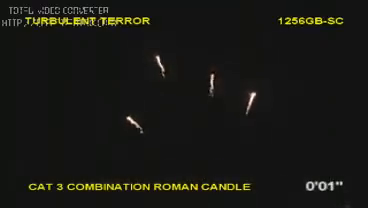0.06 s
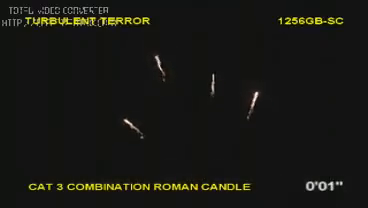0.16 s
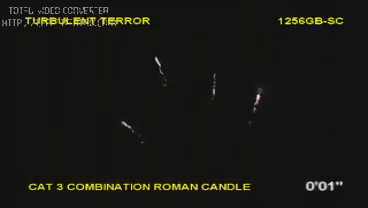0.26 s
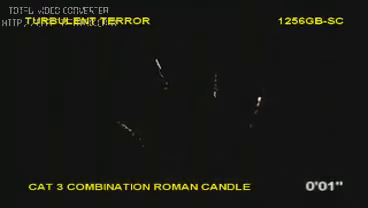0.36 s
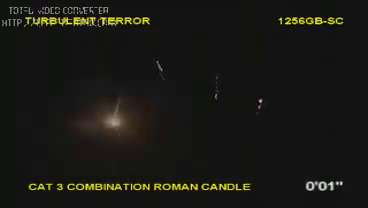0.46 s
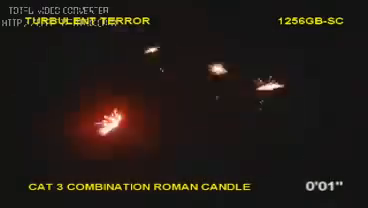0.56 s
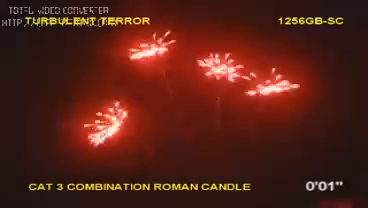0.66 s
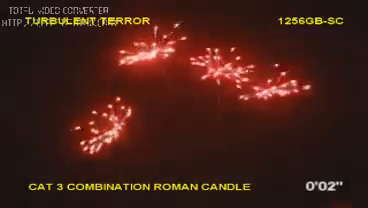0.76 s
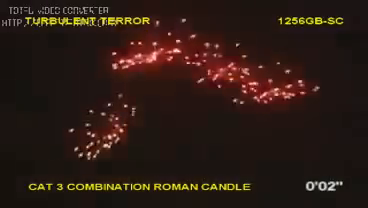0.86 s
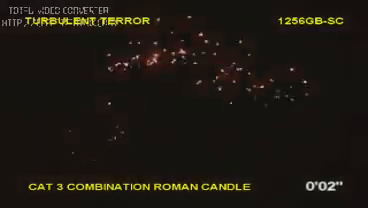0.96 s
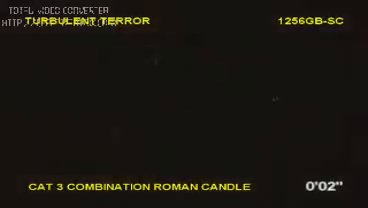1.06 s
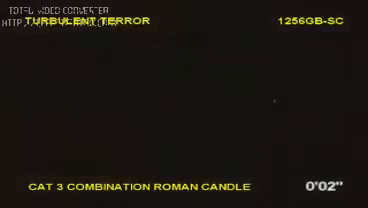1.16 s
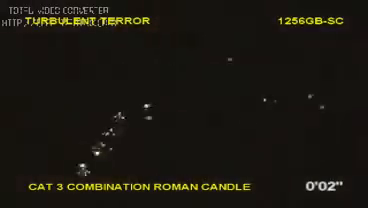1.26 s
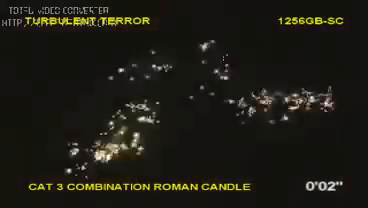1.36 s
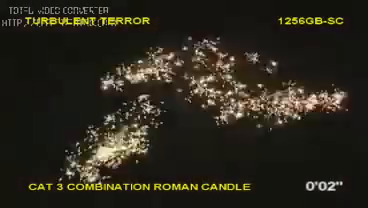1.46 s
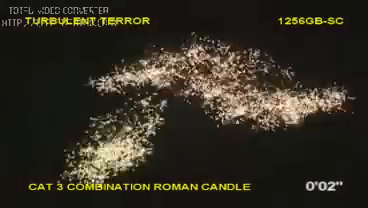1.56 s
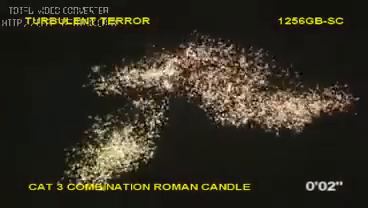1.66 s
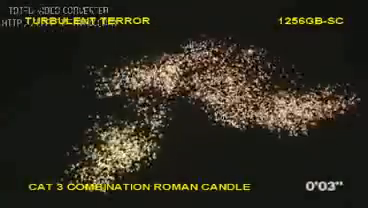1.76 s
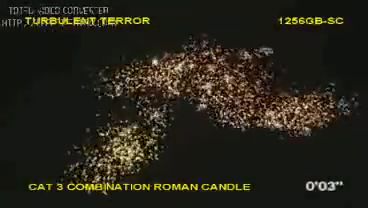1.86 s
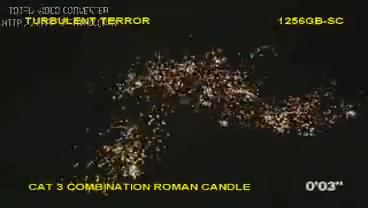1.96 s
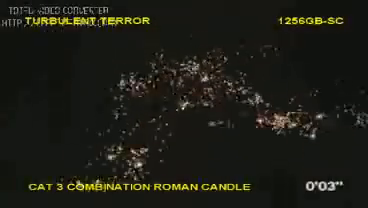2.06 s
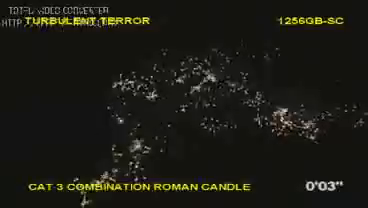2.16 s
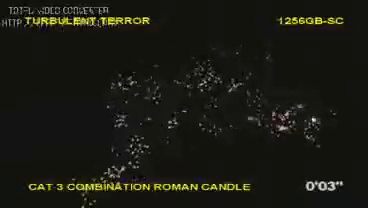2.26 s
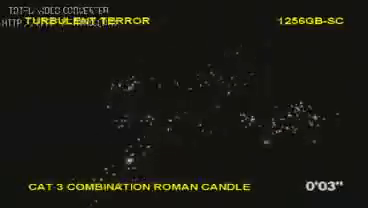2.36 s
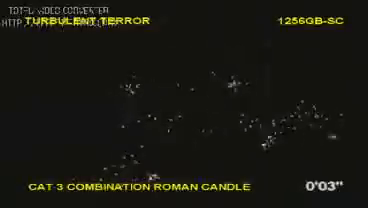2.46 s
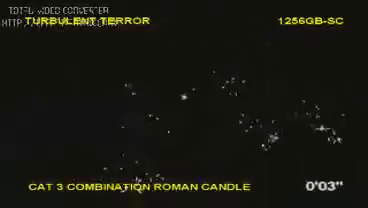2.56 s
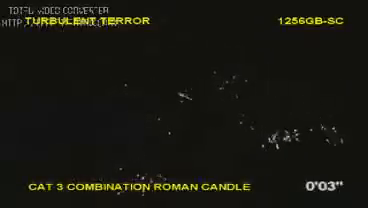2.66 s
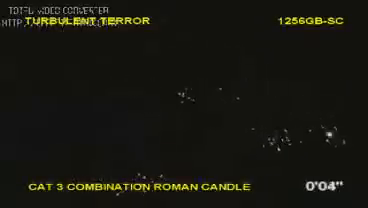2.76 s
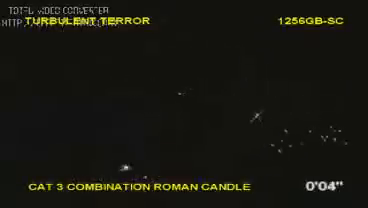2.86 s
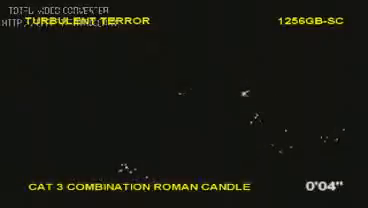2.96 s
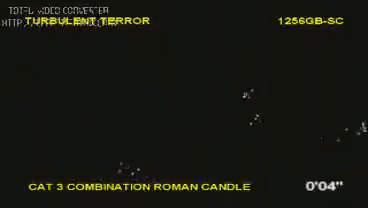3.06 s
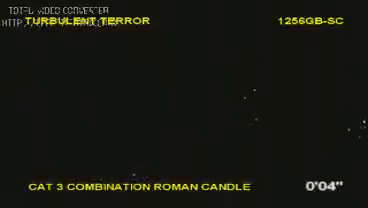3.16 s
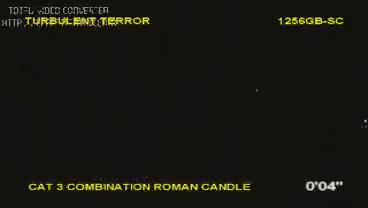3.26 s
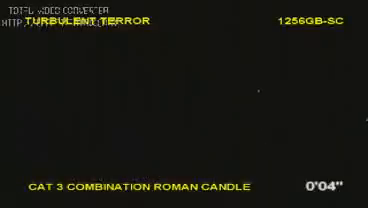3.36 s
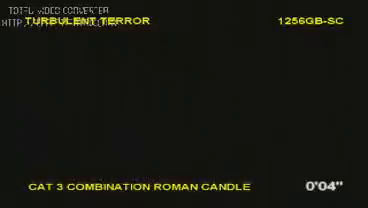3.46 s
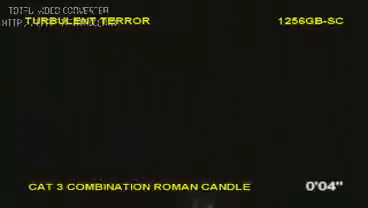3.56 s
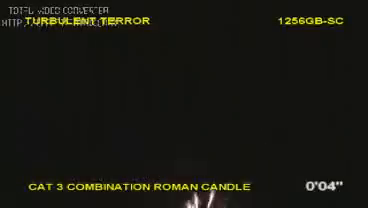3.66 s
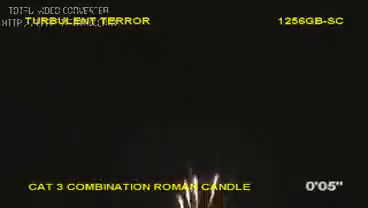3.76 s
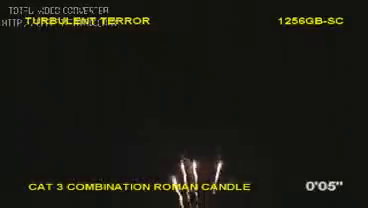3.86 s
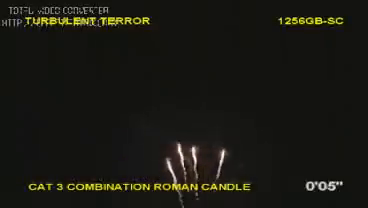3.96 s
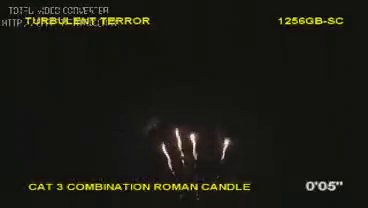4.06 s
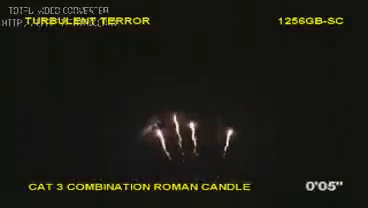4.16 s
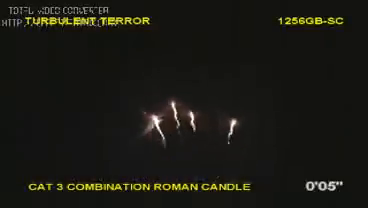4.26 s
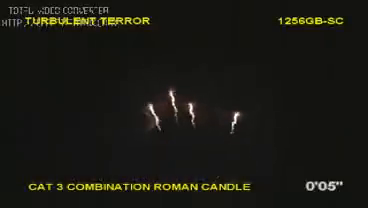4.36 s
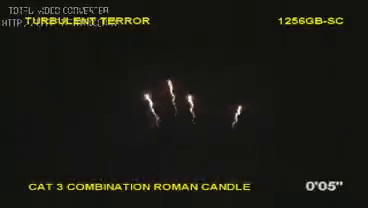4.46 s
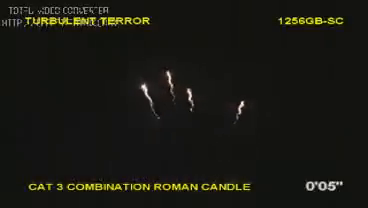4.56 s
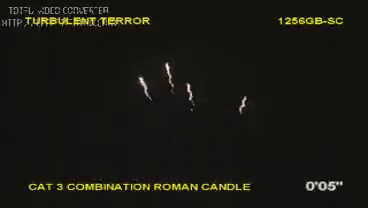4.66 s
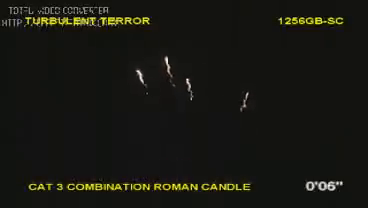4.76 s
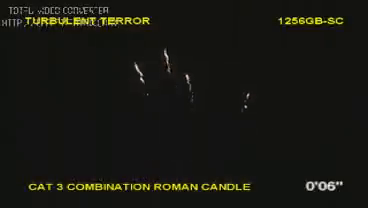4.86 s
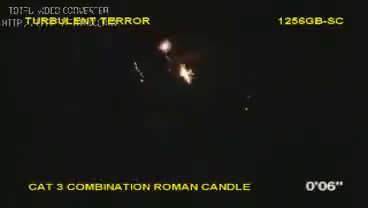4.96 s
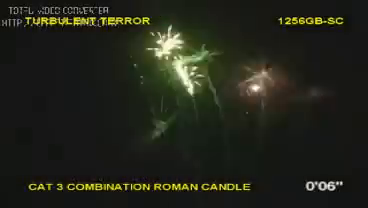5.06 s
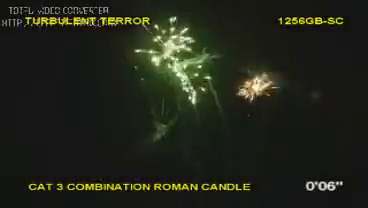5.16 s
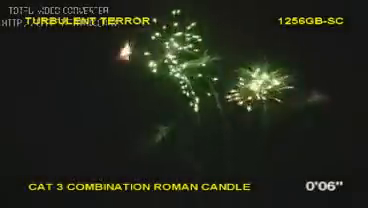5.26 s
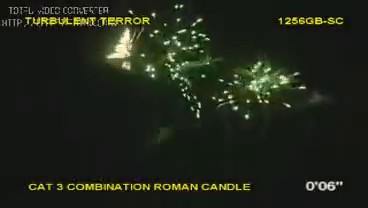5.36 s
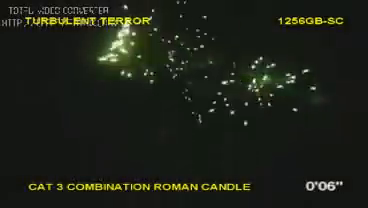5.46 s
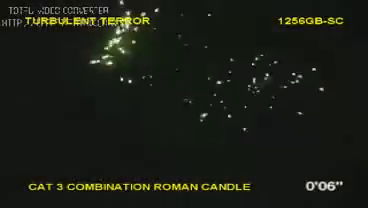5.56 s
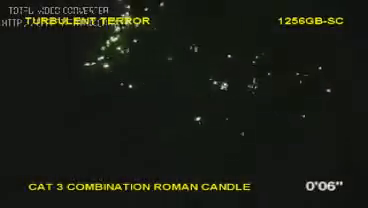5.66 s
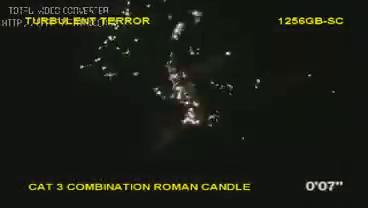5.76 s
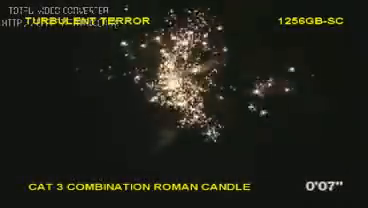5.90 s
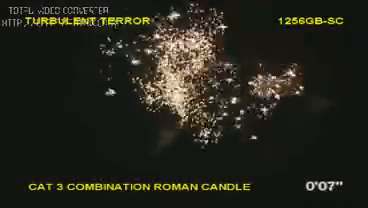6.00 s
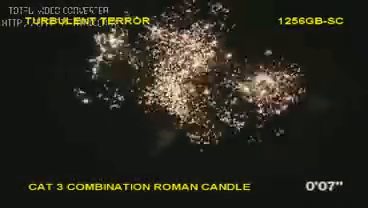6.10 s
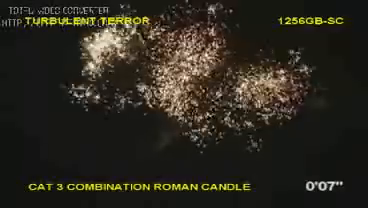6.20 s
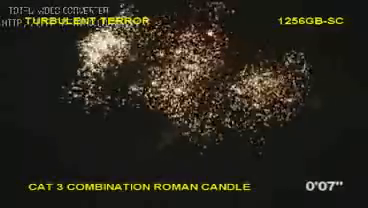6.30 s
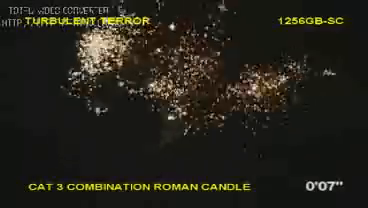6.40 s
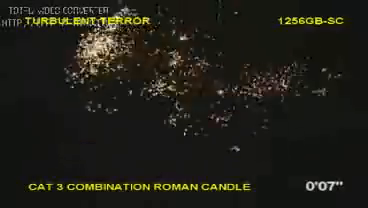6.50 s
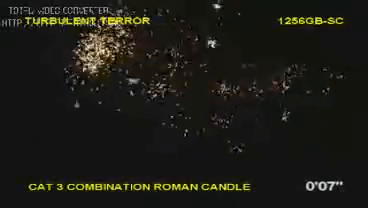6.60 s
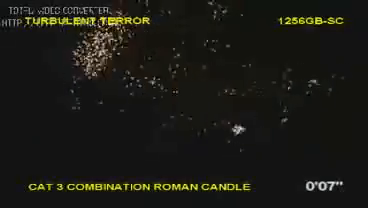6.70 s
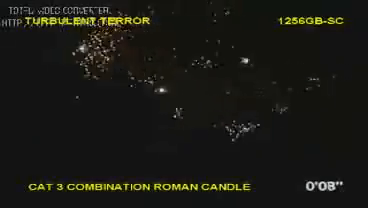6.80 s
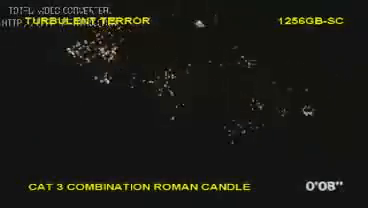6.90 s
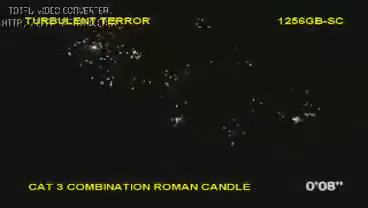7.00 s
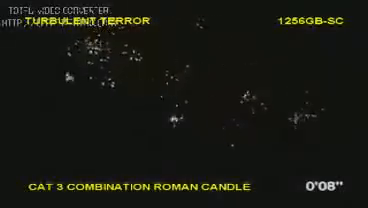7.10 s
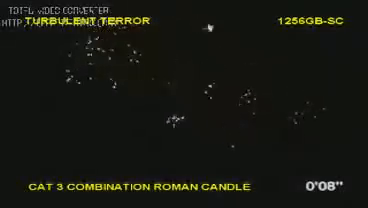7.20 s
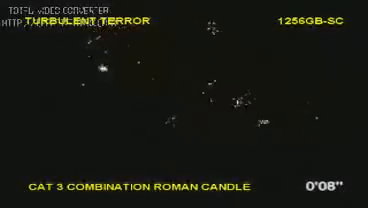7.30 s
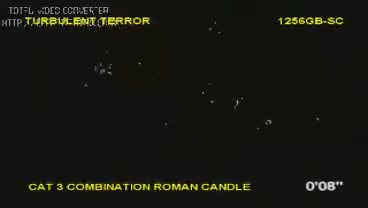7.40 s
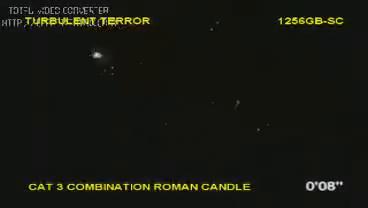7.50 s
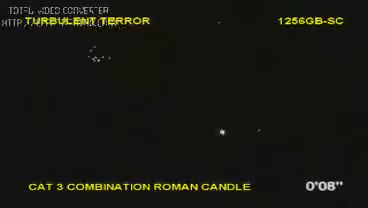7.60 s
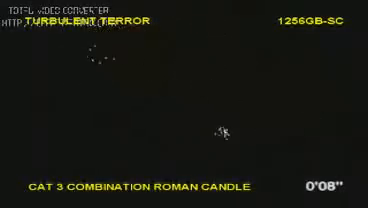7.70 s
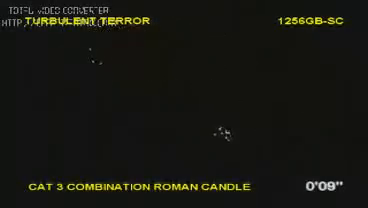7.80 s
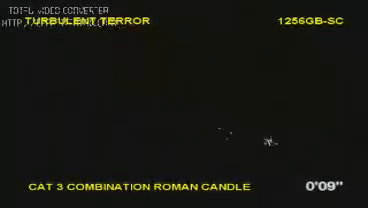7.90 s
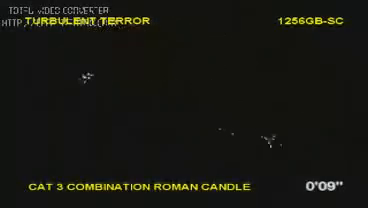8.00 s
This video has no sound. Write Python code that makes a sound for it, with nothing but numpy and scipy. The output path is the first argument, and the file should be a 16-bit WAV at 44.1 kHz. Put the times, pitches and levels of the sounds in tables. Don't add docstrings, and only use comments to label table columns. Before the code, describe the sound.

Outdoors at night, low distant traffic and wind underlie faint hiss and leftover launch echo. At about 0.8 s four shells burst within a tenth of a second, hard, clipped cracks with a barking body, reaching the left side first and the louder right about 0.09 s later. Echoes slap from houses and roll across fields while burning stars hiss. From 1.6 s a dense crackle swells, peaks near 1.8, then thins after 2.6 into separate dry snaps, nearly gone by 3.4. At 3.7-3.85 four quick hollow tube thumps fire, echoing off walls, followed by thin comet hiss. Shells bang at 5.25, almost doubled, then 5.4 and 5.55, with strong echoes and sizzling stars. A second crackling cloud catches around 6.1, peaks at 6.3, and breaks up after 7 into sparse pops until 8. Treble is gritty, smeared and dull at the very top.

```python
import sys
import numpy as np
from scipy import signal
from scipy.fft import rfft, irfft, next_fast_len
from scipy.io import wavfile
from scipy.ndimage import uniform_filter1d, minimum_filter1d

SR = 44100
rng = np.random.default_rng(int(sys.argv[2]) if len(sys.argv) > 2 else 0)


def makeup_ratio(level_db):
    decades = np.asarray(level_db, float) / 20
    return 10 ** decades


def persist_wave(psi):
    counts = np.round(np.clip(psi, -1, 1) * 32767).astype(np.int16)
    wavfile.write(sys.argv[1], SR, np.atleast_2d(counts).T)


N = 354563
M = N + SR
BINS = next_fast_len(N + 2 * SR)
HZ = np.fft.rfftfreq(BINS, 1 / SR)[:BINS // 4]

# (frequency [Hz], density [dB per Hz])
NIGHT_COLOUR = [(15, -37), (25, -14), (60, 2), (124, -5), (225, 1), (285, -11), (380, -15), (1190, -22),
                (1630, -20), (3840, -38), (7500, -38), (9750, -68), (16500, -120)]
# (lit [s], full [s], out [s], full level [dB], fall [dB/s], sizzle [dB])
TRAILS = [
    (-.3, -.1, .7, -60, 28, -14),
    (.86, 1.0, 1.66, -42, 12, -10),
    (3.68, 3.9, 5.2, -41, 24, -22),
    (5.27, 5.43, 6.14, -41, 13, -6),
]
# (frequency [Hz], density [dB per Hz])
HISS_COLOUR = [(410, -32), (700, -2), (1230, -4), (1890, -1), (2060, -4), (4260, -17), (5740, -16),
               (7500, -23), (9750, -53), (16500, -120)]
# (frequency [Hz], density [dB per Hz])
SIZZLE_COLOUR = [(1500, -40), (3000, -6), (4300, -5), (5500, 0), (7500, 0), (9750, -40)]
# (time at near mic [s], lag to far mic [ms], far level [dB])
SINGLE_STARS = [(1.5363, 91.1, -19), (1.5952, 86.9, -19), (2.1068, 87.1, -14), (2.1912, 83.8, -12),
                (2.3372, 88.9, -15), (2.3636, 75.9, -15), (2.3816, 84.3, -15), (2.4213, 85.6, -15),
                (2.4553, 85.2, -15), (2.4776, 86.2, -16), (2.5026, 90.5, -15), (2.5512, 90.6, -19),
                (2.6006, 89.1, -19), (2.6053, 90.5, -15), (2.6354, 88.4, -16), (2.6861, 92.8, -20),
                (2.695, 85.5, -17), (2.7258, 92.6, -18), (2.7295, 90.7, -20), (2.7636, 94.3, -17),
                (2.7961, 89.7, -22), (2.8608, 89.5, -20), (2.882, 91.7, -15), (2.9001, 88.2, -21),
                (2.9342, 91.2, -19), (3.0983, 89.8, -15), (3.1074, 89.7, -20), (3.1866, 93.3, -21),
                (3.3212, 87.7, -21),
                (6.0961, 90.7, -15), (6.7787, 78.2, -13), (6.8156, 84.7, -15), (6.8915, 80.6, -14),
               (6.9049, 78.5, -16), (6.9961, 83.9, -19), (7.0201, 80.9, -18), (7.0399, 90.1, -14),
               (7.0614, 87.9, -16), (7.0971, 86.3, -17), (7.1175, 86.7, -15), (7.1199, 91.9, -17),
               (7.1375, 76.3, -16), (7.1697, 76, -16), (7.1866, 87, -20), (7.2083, 77.3, -17),
               (7.2284, 86.5, -20), (7.3115, 89, -20), (7.3212, 76.3, -18), (7.359, 90.5, -20),
               (7.3676, 79.1, -14), (7.4122, 84.4, -18), (7.4139, 89.4, -24), (7.4568, 88.8, -20),
               (7.5909, 79.5, -18), (7.593, 86.7, -21), (7.6138, 88.7, -18), (7.8159, 77.8, -14),
               (7.9493, 90.3, -22)]
# (catches [s], full [s], nearly spent [s], full level at far mic [dB])
CLOUDS = [
    (1.6, 1.83, 2.58, -29.5),
    (6.07, 6.31, 7.0, -29.3),
]
# (time at near mic [s], near peak [dB], lag to far mic [ms], far peak [dB], far ground bounce [ms])
LIFTS = [
    (-.75, -18, 98, -9, .6),
    (-.65, -18, 98, -9, .6),
    (3.6743, -17, 98, -7, .6),
    (3.7223, -17, 97.6, -7, .6),
    (3.7765, -16, 97.6, -6, .6),
    (3.8332, -16, 98, -5, .6),
]
# (time at near mic [s], near peak [dB], lag to far mic [ms], far peak [dB], far ground bounce [ms])
BURSTS = [
    (.7774, -3, 89.4, 8, 2.5),
    (.8266, -3, 87.4, 7, 3.2),
    (.8608, -3, 85.8, 5, 3.4),
    (.877, -5, 82.3, 5, 3.9),
    (5.2444, -2, 85.3, 8, 3.5),
    (5.2558, -2, 80, 7, 4.4),
    (5.4188, -3, 86.6, 7, 3.4),
    (5.5334, -3, 79.5, 8, 4),
]
# (time [s], peak [dB])
HOUSE_RETURNS = [(1.025, -18), (1.049, -20), (1.083, -20), (1.108, -20), (1.149, -22), (1.189, -24),
                 (5.449, -19), (5.459, -19), (5.476, -16), (5.728, -15), (5.761, -13), (5.847, -21)]
# (delay [s], near level [dB], far level [dB], dull above [Hz])
HIGH_WALLS = [(.014, -22, -4, 2500), (.007, -14, -13, 1400), (.33, -20, -20, 900)]
# (delay [s], near level [dB], far level [dB], dull above [Hz])
LOW_WALLS = [(.014, -11, -2, 450), (.033, -5, 0, 450), (.1087, -13, -5, 3500), (.166, -7, -9, 500),
             (.22, -9, -9, 400), (.386, -12, -10, 900)]
# (time after blast [s], near level [dB], far level [dB])
FIELD_DECAY = [(0, -8, -8), (.015, -16, -13), (.04, -27, -22), (.1, -32, -20), (.18, -25, -17),
               (.36, -23, -20), (.5, -27, -23), (1.2, -35, -31), (2.5, -48, -45)]
# (frequency [Hz], extra T60 [s], near level [dB], far level [dB])
AIR = [(100, 9, 0, -3), (300, 8, 2, -3), (800, 5, 4, 2), (1500, 4, -3, -3), (3000, 3, -5, -4),
       (5000, 2.5, -2, -4), (7500, 2, -3, -4)]
# (frequency [Hz], gain [dB])
NEAR_MIC = [(30, -20), (100, -8), (220, 2), (500, 2.5), (1200, 1.5), (2500, 0), (4200, 0), (5500, 4),
            (7500, 2)]
# (frequency [Hz], gain [dB])
FAR_MIC = [(30, -24), (100, -8), (250, 2), (600, 1.5), (1200, 0), (2200, 0), (3300, 3), (4400, -4),
           (6200, 1.5), (7500, 0)]
SEAMS_HZ = [148, *range(300, 4300, 300), 4800, 5100, 5400, 6000, 6600, 7200]


def unit(x):
    return x / np.sqrt(np.mean(x ** 2) + 1e-20)


def along(points, hz, column=1):
    table = np.transpose(points)
    return np.interp(np.log(hz + 1), np.log(table[0] + 1), table[column])


def spectrum(x):
    return rfft(x, BINS)[..., :len(HZ)]


def causal(points):
    cepstrum = irfft(np.log(makeup_ratio(along(points, np.fft.rfftfreq(4096, 1 / SR)))))
    cepstrum[1:2048] *= 2
    cepstrum[2049:] = 0
    return irfft(np.exp(rfft(cepstrum)))


def resonance(centre_hz, width_hz):
    return 1j * HZ * width_hz / (centre_hz ** 2 - HZ ** 2 + 1j * HZ * width_hz)


def noise(points, sway_db, rate_hz):
    knots = rng.standard_normal((2, 420))
    sway = np.array([np.interp(np.arange(N) * rate_hz / SR, np.arange(420), k) for k in knots])
    white = rng.standard_normal((2, 2 * len(HZ))).view(complex)
    colour = makeup_ratio(along(points, HZ)) / (1 + (HZ / 6500) ** 2)
    return unit(irfft(white * colour, BINS)[:, :N] * makeup_ratio(sway_db * sway))


def ticks(s, db):
    at = np.round((s + 1) * SR).astype(int)
    return np.bincount(at[at < M], makeup_ratio(db)[at < M], M)


def arrivals(rows, near_bounce_db, far_bounce_db):
    s, near_db, lag_ms, far_db, bounce_ms = np.transpose(rows)
    far_s = s + lag_ms / 1000
    direct = np.array([ticks(s, near_db), ticks(far_s, far_db)])
    near_ground = ticks(s + .22e-3 * bounce_ms, near_db + near_bounce_db)
    far_ground = ticks(far_s + 1e-3 * bounce_ms, far_db + far_bounce_db)
    return direct, direct + np.array([near_ground, far_ground])


def blast(push_s, fade):
    u = np.arange(int(30 * push_s * SR) + 9) / (push_s * SR)
    return spectrum((1 - u) * np.exp(-fade * u))


def walls(table):
    total = 0
    for delay_s, near_db, far_db, dull_hz in table:
        face = np.exp(-2j * np.pi * HZ * delay_s) / (1 + 1j * HZ / dull_hz) ** 2
        total = total + makeup_ratio(np.array([[near_db], [far_db]])) * face
    return total


def fields(wet_db, lumpy_db):
    hz, t = np.fft.rfftfreq(256, 1 / SR)[:50], np.arange(680) * 128 / SR
    s, *levels_db = np.transpose(FIELD_DECAY)
    shape_db = np.array([np.interp(t, s, c) for c in levels_db])
    shape_db = shape_db + lumpy_db * rng.standard_normal((2, len(t)))
    colour_db = np.array([along(AIR, hz, column=2), along(AIR, hz, column=3)])
    fading = makeup_ratio(-60 * t / along(AIR, hz)[:, None])
    z = rng.standard_normal((2, len(hz), 2 * len(t))).view(complex) / 16
    z *= makeup_ratio(wet_db + shape_db)[:, None] * makeup_ratio(colour_db)[..., None] * fading
    return signal.istft(np.pad(z, ((0, 0), (0, 79), (0, 0))), SR, nperseg=256)[1]


def night():
    return makeup_ratio(np.array([[-61], [-47]])) * noise(NIGHT_COLOUR, sway_db=1.5, rate_hz=6)


def burn_gain(lead_s, sizzle_share):
    t = np.arange(N) / SR + lead_s
    total = 0
    for lit, full, out, full_db, fall, sizzle_db in TRAILS:
        db = np.interp(t, [lit, full, out], [full_db - 14, full_db, full_db - fall * (out - full)])
        total = total + ((t > lit) & (t < out)) * makeup_ratio(db) * makeup_ratio(sizzle_share * sizzle_db)
    return total


def trails():
    def gain(share):
        near, far = makeup_ratio(-8) * burn_gain(.09, share), makeup_ratio(8) * burn_gain(0, share)
        return uniform_filter1d([near, far], size=900)

    hiss = gain(0) * noise(HISS_COLOUR, sway_db=4, rate_hz=35)
    return hiss + gain(1) * noise(SIZZLE_COLOUR, sway_db=4, rate_hz=50)


LOW_LAG_MS, LAG_SPAN_MS = 94, 18


def star_rows(far_s, lag_ms, far_db):
    height = np.clip((LOW_LAG_MS - lag_ms) / LAG_SPAN_MS, 0, 1)
    bounce_ms = 1.7 + 2.6 * height
    return np.c_[far_s - lag_ms / 1000, far_db - 11.5, lag_ms, far_db, bounce_ms]


def cloud(catch_s, full_s, spent_s, full_db, count=6000, lasts_s=2.1):
    catch_db, sag_db_per_s, spent_db, dying_db_per_s = -8, 7.5, -5, 20
    big_share, big_db, big_scatter_db = .045, -11, 5
    when, height, size, lot = rng.random((count, 4)).T
    s = catch_s + when * lasts_s
    spent = s > spent_s
    rising_db = catch_db * np.clip((full_s - s) / (full_s - catch_s), 0, 1) ** 2.1
    sag_db = sag_db_per_s * np.clip(s - full_s, 0, spent_s - full_s)
    dying_db = dying_db_per_s * np.clip(s - spent_s, 0, None)
    db = full_db + rising_db - sag_db - dying_db + spent_db * spent
    db = db + 13 - 3.5 * np.log(size + .03)
    big = (lot < big_share) & ~spent & (s > full_s - .1)
    db = np.where(big, big_db + rising_db + big_scatter_db * (size - .5), db)
    alight_share = np.interp(s, [catch_s, full_s, spent_s], [.04, .6, .2])
    db[lot > alight_share] = -200
    return star_rows(s, LOW_LAG_MS - LAG_SPAN_MS * height, db)


def stars():
    s, lag_ms, db = np.transpose(np.array(SINGLE_STARS))
    single = star_rows(s + lag_ms / 1000, lag_ms, db + 8.7)
    rows = np.vstack([single, *[cloud(*c) for c in CLOUDS]])
    direct, both = arrivals(rows, near_bounce_db=-4, far_bounce_db=-1.5)
    rumble = 1 + makeup_ratio(15) / (1 + 1j * HZ / 260) ** 3
    echoes = spectrum(fields(wet_db=-28, lumpy_db=3)) * rumble
    return (spectrum(both) + spectrum(direct) * echoes) * blast(push_s=.12e-3, fade=.87)


def lifts():
    direct, both = arrivals(LIFTS, near_bounce_db=-6, far_bounce_db=-4)
    echoes = walls(LOW_WALLS) + spectrum(fields(wet_db=-28, lumpy_db=3))
    push = (spectrum(both) + spectrum(direct) * echoes) * blast(push_s=.7e-3, fade=.6)
    push = push * makeup_ratio(-1.8) * (1 + makeup_ratio(3) * resonance(centre_hz=230, width_hz=170))
    dying = makeup_ratio(np.array([[-12], [-4.5]]) - 60 * np.arange(SR // 10) / SR / .013)
    spit = signal.oaconvolve(direct, dying, axes=1)[:, :M] * rng.standard_normal(direct.shape)
    low_hz, high_hz = np.array([[4000], [1800]]), np.array([[9000], [4500]])
    sharp = 1j * HZ / (low_hz + 1j * HZ) / (1 + 1j * HZ / high_hz)
    return push + sharp * spectrum(spit) * (1 + makeup_ratio(11) * echoes)


def house_answers():
    s, db = np.transpose(HOUSE_RETURNS)[..., None]
    late, size = rng.random((len(HOUSE_RETURNS), 8, 2)).transpose(2, 0, 1)
    spread_ms = 7
    answers = ticks((s + late * spread_ms / 1000).ravel(), (db + 10.5 - 12 * size).ravel())
    return uniform_filter1d(answers, size=9)


def bursts():
    direct, echoed = arrivals(BURSTS, near_bounce_db=-4, far_bounce_db=-2.5)
    tails = [fields(wet_db=-27, lumpy_db=3) for shell in BURSTS[::2]] * 2
    for side in range(2):
        for at, tail in zip(np.flatnonzero(direct[side]), tails):
            echoed[side, at:at + tail.shape[1]] += direct[side, at] * tail[side, :M - at]
    echoed[1] += house_answers()
    paths = spectrum(echoed) + spectrum(direct) * walls(HIGH_WALLS)
    bark = makeup_ratio(-7) * resonance(centre_hz=760, width_hz=500)
    crack = 1.2 * (1j * HZ / (4500 + 1j * HZ)) ** 2
    return paths * blast(push_s=.28e-3, fade=.5) * (1 + bark + crack)


def scene():
    microphones = spectrum(np.array([causal(NEAR_MIC), causal(FAR_MIC)]))
    blasts = irfft((bursts() + lifts() + stars()) * microphones, BINS)[:, SR:M]
    return blasts + trails() + night()


def shared_treble(x, grit_db, smear_db=-24, starve_db=-34, uneven_db=7):
    shared_hz, holes_hz = 3450, 2300
    hz, t, z = signal.stft(x, SR, nperseg=1024)
    z, hz = z[:, :224], hz[:224, None]

    def power(v):
        return uniform_filter1d(abs(v) ** 2, size=14, axis=-2) + 1e-18

    both = z.sum(axis=0)
    z = np.where(hz > shared_hz, both * np.sqrt(power(z) / power(both) + makeup_ratio(-40)), z)
    smear = makeup_ratio(2 * smear_db) * abs(uniform_filter1d(power(z), size=5)) * (hz > 900)
    spread = makeup_ratio(2 * grit_db) * power(z) + smear
    z = z + np.sqrt(spread) * np.exp(2j * np.pi * rng.random(z.shape))
    loud = np.roll(-minimum_filter1d(-power(z).max(axis=(0, 1)), size=3), 4)
    uneven = makeup_ratio(2 * (starve_db + uneven_db * rng.standard_normal((16, len(t)))))
    floor = loud * (loud / loud.max()) ** .45 * uneven.repeat(14, axis=0)
    z = z * np.where((hz > holes_hz) & (power(both) < floor), makeup_ratio(-20), 1)
    return signal.istft(np.pad(z, ((0, 0), (0, 289), (0, 0))), SR, nperseg=1024)[1][:, :N]


def dip(centre_hz, width_hz, depth):
    rest = centre_hz * centre_hz - HZ ** 2
    return (rest + 1j * HZ * width_hz * depth) / (rest + 1j * HZ * width_hz)


def roll_off(x):
    return signal.sosfilt(signal.butter(12, 8740, fs=SR, output="sos"), x)


def record(dry):
    x = dry / (1 + abs(dry / [[.63], [.6]]) ** 4.5) ** (1 / 4.5)
    seams = np.prod([dip(c, width_hz=26, depth=.25) for c in SEAMS_HZ], axis=0)
    over_hz = HZ - 7680
    edge = makeup_ratio(-np.clip(over_hz, 0, 200) * .12 - np.clip(over_hz, 0, 2000) * .035)
    mix = irfft(spectrum(shared_treble(x, grit_db=-12)) * seams * edge, BINS)[:, :N]
    return roll_off(mix)


dry = scene()
out = record(dry)
persist_wave(out)
```